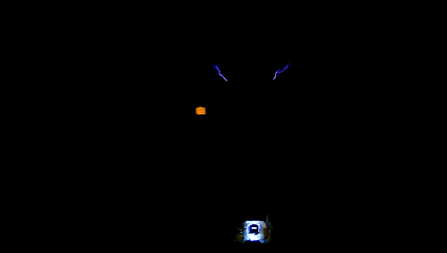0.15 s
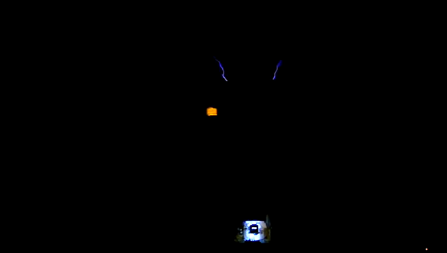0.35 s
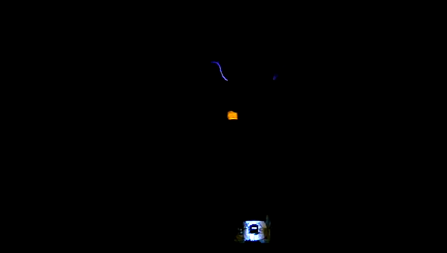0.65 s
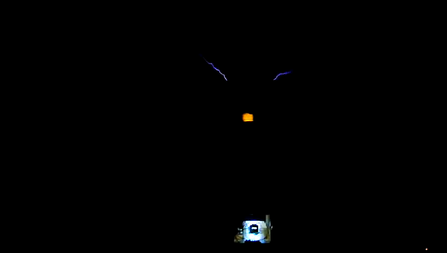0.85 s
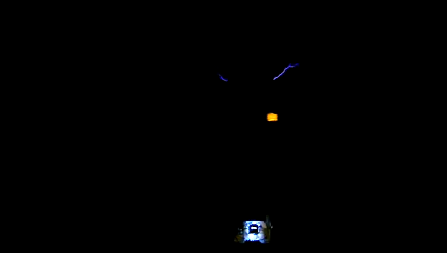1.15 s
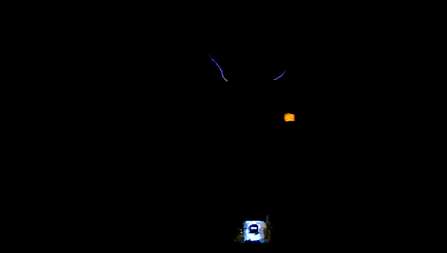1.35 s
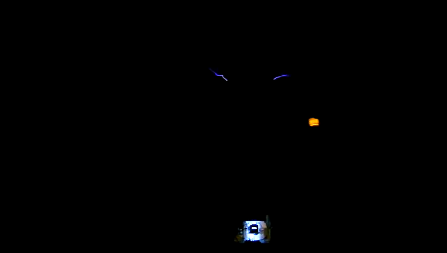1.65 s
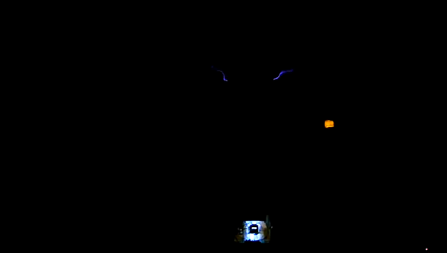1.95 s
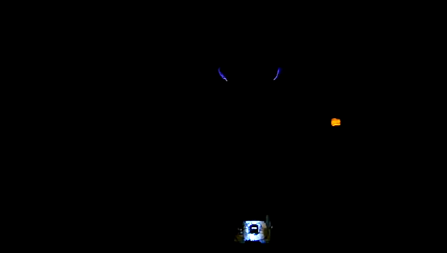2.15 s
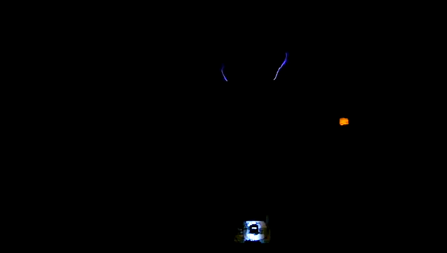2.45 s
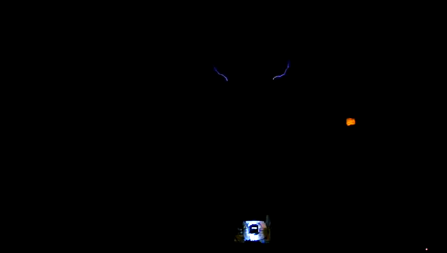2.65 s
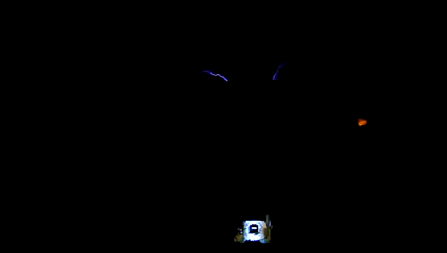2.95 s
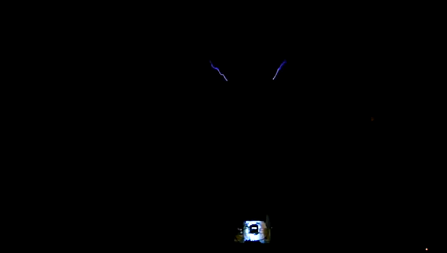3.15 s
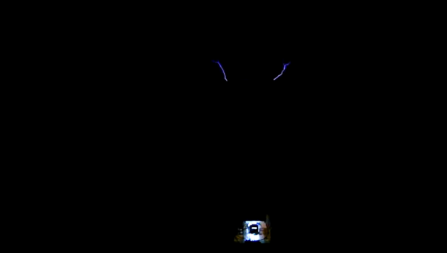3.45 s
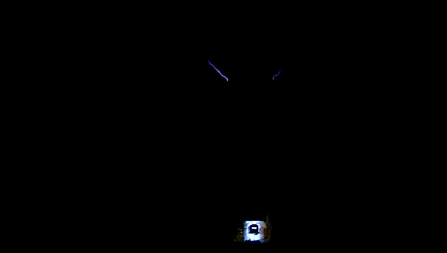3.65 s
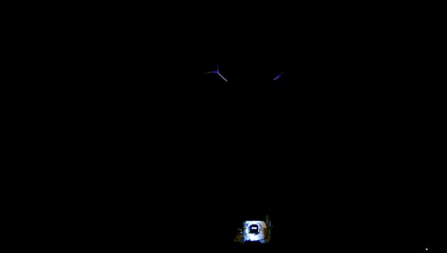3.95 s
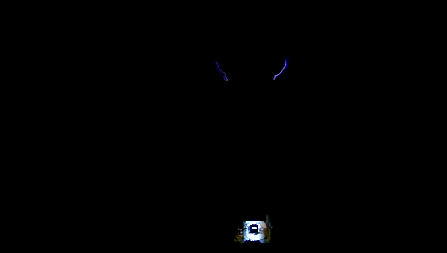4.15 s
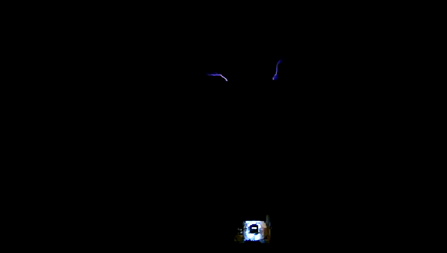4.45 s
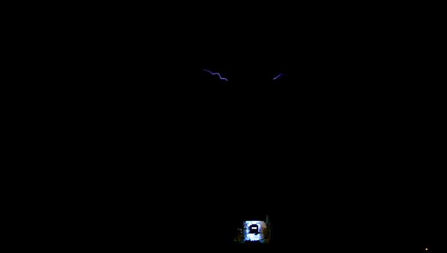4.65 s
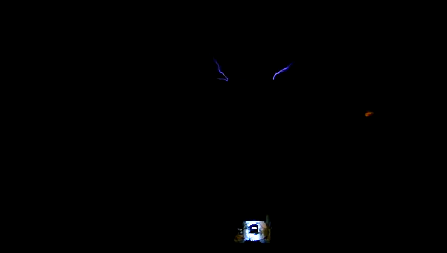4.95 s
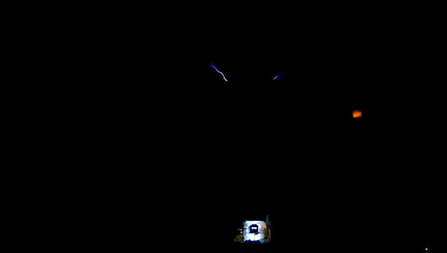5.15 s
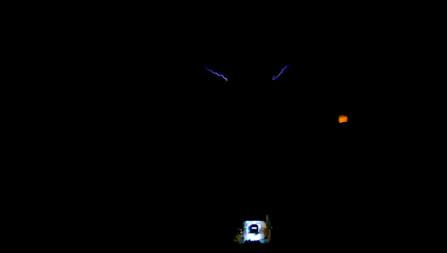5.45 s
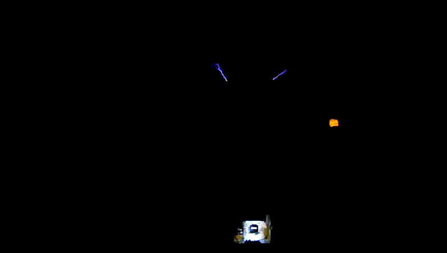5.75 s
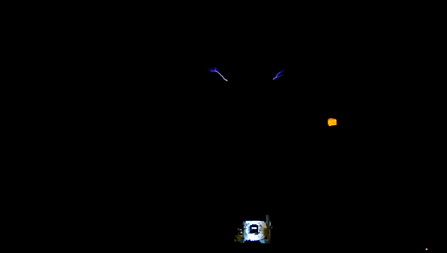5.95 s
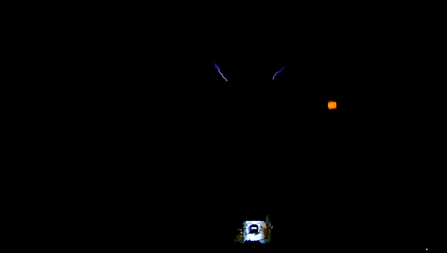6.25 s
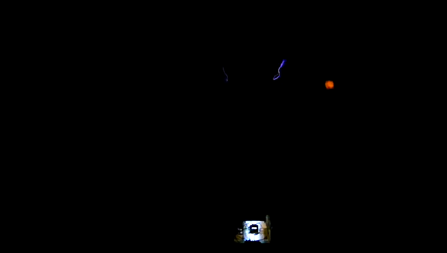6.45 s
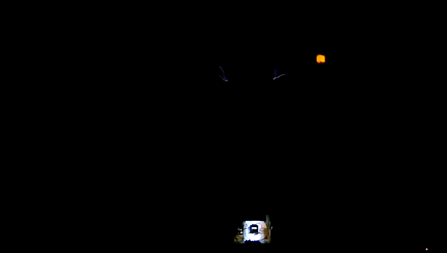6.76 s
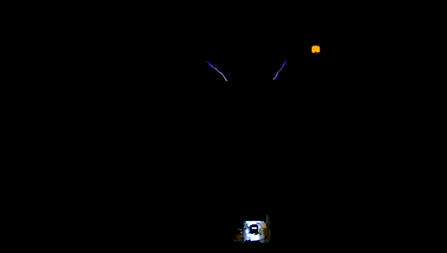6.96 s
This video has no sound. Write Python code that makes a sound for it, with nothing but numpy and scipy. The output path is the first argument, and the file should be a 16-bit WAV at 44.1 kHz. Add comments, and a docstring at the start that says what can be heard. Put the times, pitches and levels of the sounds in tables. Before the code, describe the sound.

Steady, loud electrical discharge from a spark-gap coil, a gritty mains-rate buzz full of crackling streamers and sharp snaps, ringing in a hard-walled garage.

```python
"""Spark-gap coil in a bare garage

A high-voltage coil runs steadily a few metres from a mono microphone: a harsh, buzzing sizzle.
Its gap fires four times per mains half cycle; each firing is a filtered click in the gap and in two streamers.
The streamers crack unevenly and now and then snap hard. Floor, walls and a noise tail smear the clicks.
Resonances of the garage ring along; a wavering hum and filtered-noise rumble lie beneath.
"""
import sys
import numpy as np
from scipy import signal
from scipy.fft import rfft, irfft
from scipy.io import wavfile
from scipy.ndimage import uniform_filter1d

SR = 44100
rng = np.random.default_rng(int(sys.argv[2]) if len(sys.argv) > 2 else 0)


def transcribe(u):
    """Save the signal u as a 16-bit wav file named by the first command-line argument.

    u: samples, shape (n,) or (channels, n), limited to [-1, 1]; the rate is SR.
    q: integer samples, one column per channel.
    """
    v = np.clip(np.atleast_2d(u).T, -1, 1)
    q = np.round(v * 32767).astype(np.int16)
    wavfile.write(sys.argv[1], SR, q)


N = 312669
TIME_S = np.arange(N) / SR

# low background rumble, relative spectrum: f/Hz, level/dB
RUMBLE_SPECTRUM = [(20, -1.5), (45, -8), (75, 1), (115, -1), (160, -3), (300, 7), (1000, -16), (4000, -46)]
# hum coming and going: t/s, rms level/dB
HUM_LEVEL = [(0, -65), (.5, -67), (1.2, -60), (1.45, -75), (2.5, -65), (3.4, -65), (3.8, -73), (4.3, -64),
             (5.8, -63), (6.15, -71), (6.5, -63)]
# first reflections from ceiling and walls: delay/s, level/dB
ECHOES = [(.0036, -6), (.0093, -4.5), (0.01, -3), (0.0122, -4), (0.0151, -22), (0.017, -16.5)]
# resonances of the garage and the things in it: f/Hz, width/Hz, lift/dB
RINGS = [(184.4, 1.5, 15), (239.6, 2, 9), (290, 16, 5.5), (327, 4, 9), (344.5, 4, 8.5), (411.8, 2.5, 11),
         (502, 3, 7), (566, 10, 5.5), (670.2, 4, 7), (706.6, 3, 6), (756.4, 3, 6), (816.9, 4, 5),
         (962.3, 4, 4), (1227.4, 6, 5), (1434.6, 5, 4), (1512.7, 7, 4.5), (2252, 20, 3.5), (2897, 25, 4),
         (3031, 19, 5), (3196, 22, 4), (3488, 18, 3), (3731, 25, 4), (3853, 14, 3), (3937, 20, 2.5),
         (4157, 16, 4), (4861, 25, 3.5), (4933, 14, 3.5), (5130, 120, 1), (5469, 20, 4), (6105, 12, 5.5),
         (6177, 40, 5.5)]
# bands that cancel at the microphone position: f/Hz, width/Hz, level/dB
HOLLOWS = [(260, 10, -4), (385, 35, -5), (440, 12, -4), (520, 24, -5), (585, 8, -6), (735, 25, -3),
           (1306, 75, -5.5)]
# firings in a mains half cycle, before scatter: place/(0-1 of half cycle), level/dB
FIRINGS = [(.08, -1), (.3, -1), (.58, -4.8), (.87, -1.5)]
# slow swell of the discharge, before flutter and lurches: t/s, level/dB
SLOW_SWELL = [(0.0, -25.6), (0.35, -25.15), (0.68, -25.1), (0.85, -25.7), (1.05, -25.3), (1.2, -25.8),
              (1.4, -25.2), (1.8, -25.3), (2.2, -25.15), (2.35, -25.3), (2.55, -24.7), (2.85, -25.8),
              (3.3, -25.8), (3.6, -25.35), (4.1, -25.8), (4.35, -25.0), (4.75, -25.5), (5.0, -24.7),
              (5.15, -25.7), (5.35, -25.1), (5.7, -25.1), (6.05, -25.8), (6.25, -25.3), (6.4, -25.6),
              (6.75, -24.8), (7.0, -25.7)]
# brief surges and falters: t/s, Gaussian sigma/s, streamer level/dB, gap level/dB
LURCHES = [(.07, .03, -.3, 1.5), (.39, .04, .3, 2), (.55, .025, -.8, -.3), (.74, .02, .6, 1.3),
           (.98, .018, -1.3, -1.6), (1.05, .02, .3, 1.5), (1.22, .03, .3, -1), (1.6, .06, .8, -1.2),
           (1.87, .018, -1.4, -1.4), (2.17, .05, 0, .7), (2.42, .02, -.8, -1.2), (2.61, .02, 1, 1.2),
           (2.88, .03, -1.1, -1.8), (3.01, .04, 0, 1.6), (3.47, .022, -1.8, -3), (3.59, .02, 1, .5),
           (3.87, .028, -.6, -4.2), (4.01, .015, -1.2, -.6), (4.17, .05, .4, -1.5), (4.33, .018, .3, 1.1),
           (4.41, .018, -.5, -1.5), (4.7, .05, 1, -1.2), (4.85, .018, -1.2, -.6), (5.13, .02, .6, 1.8),
           (5.2, .018, -1.6, -.4), (5.6, .04, 0, .8), (5.8, .025, -1.5, -.3), (5.97, .022, -1.4, -2.6),
           (6.2, .03, .2, .9), (6.31, .025, 0, -1.3), (6.48, .02, -.8, -.8), (6.99, .03, 0, 1)]
# relative spectrum of a bang in the gap: f/Hz, level/dB
GAP_SPECTRUM = [(100, -65), (170, -34), (280, -17.5), (650, -17.5), (820, -13), (1000, -10), (2000, -8),
                (3100, -3.5), (4000, 0.5), (5100, -3.5), (5700, -5), (6400, -5), (7300, -17), (8600, -16.5),
                (10600, -10.5), (12500, -26), (15000, -43)]
# relative spectrum of a streamer's crack, duller from its long channel: f/Hz, level/dB
STREAMER_SPECTRUM = [(100, -71.5), (175, -30.5), (290, -22.5), (600, -14.5), (950, -14), (2000, -6),
                     (2500, -2.5), (2750, -2.5), (2950, -0.5), (3900, 0.75), (5050, -1.1), (5500, -5.5),
                     (6500, -8), (8500, -22.5), (10400, -18), (12500, -32), (15000, -46.5)]
# hardest streamer snaps, before floor and garage: t/s, peak level/dB
SNAPS = [(0.098, -13), (0.206, -12.2), (0.7915, -11.6), (0.8402, -11.1), (0.8737, -12.1), (0.9417, -9.4),
         (0.9568, -13.2), (1.1687, -13.1), (1.2068, -12.3), (1.7236, -8.4), (1.831, -13.4), (1.8491, -12.7),
         (1.8731, -12.5), (1.9507, -13.5), (1.9641, -12.2), (2.0416, -12.8), (2.8645, -11.3),
         (2.881, -13.8), (2.9566, -13), (3.1007, -13.2), (3.1749, -13.1), (3.2023, -13.3), (3.4495, -13.2),
         (3.4832, -12.9), (3.6316, -12.8), (3.6766, -12.8), (3.8328, -13.2), (3.8728, -12), (4.0067, -12.5),
         (4.031, -13.4), (4.0483, -12.4), (4.1075, -13.4), (4.1477, -12.8), (4.5511, -12.1),
         (4.7621, -12.3), (5.1338, -12.5), (5.3814, -13), (5.9317, -13.2), (5.9553, -13.2), (6.09, -12.1),
         (6.1144, -11.5), (6.1656, -12.3), (6.197, -12), (6.4742, -11.6), (6.8012, -13.4), (6.9917, -11.7),
         (7.0069, -11.9)]
# dead bands of the microphone's sound: f/Hz, width/Hz
NOTCHES = [(7860, 556), (11830, 580)]

HUM_HZ, HUM_WAVER_HZ = 411, 1.8
FLOOR_DELAY_S, FLOOR_DB = .00192, -8.5
HALF_CYCLE_RATE_HZ = 120.035
# capacitor charge swings between firings, so strong and weak bangs take turns
SWING_HZ, SWING_WIDTH_HZ, SWING_RMS_DB = 74, 22, 1.8
FLUTTER_DB, FLUTTER_PER_S = 0.18, 30
# strong discharge rasps evenly, weak one crackles: level, and power share of bare cracks
SMOOTH_ABOVE_DB, RAGGED_BELOW_DB = -25.25, -26.0
SMOOTH_SHARE, RAGGED_SHARE = .10, .39
TOP_HZ = 14950


def undb(db):
    """Decibels to amplitude gain."""
    return 10 ** (np.asarray(db) / 20)


def level(x, rms_db):
    """Scale to an rms level."""
    return x * undb(rms_db) / np.sqrt(np.mean(x ** 2))


def through(x, response):
    """Convolve with an impulse response, keeping the length."""
    return signal.fftconvolve(x, response)[:len(x)]


def click(spectrum, size=4096):
    """Minimum-phase pulse with a given spectrum, peak 1, by folding the cepstrum."""
    hz, db = np.transpose(spectrum)
    bins_hz = np.maximum(np.fft.rfftfreq(size, 1 / SR), 1)
    bins_db = np.interp(np.log(bins_hz), np.log(hz), db)
    cepstrum = irfft(np.log(undb(bins_db)))
    cepstrum[1:size // 2] *= 2
    cepstrum[size // 2 + 1:] = 0
    pulse = irfft(np.exp(rfft(cepstrum)))
    return pulse / pulse[np.argmax(np.abs(pulse))]


def resonance(x, hz, width_hz):
    """Two-pole band-pass, gain 1 at the centre."""
    return signal.lfilter(*signal.iirpeak(hz, hz / width_hz, fs=SR), x)


def impulses(times_s, sizes):
    """One impulse at each time."""
    inside = (times_s >= 0) & (times_s < N / SR)
    return np.bincount((times_s[inside] * SR).astype(int), sizes[inside], N)


def wander(per_s):
    """Straight lines between normal random values drawn at a given rate."""
    beats_s = np.arange(0, N / SR + 1, 1 / per_s)
    return np.interp(TIME_S, beats_s, rng.standard_normal(len(beats_s)))


def rumble():
    """Low background: noise shaped by the rumble spectrum."""
    return level(through(rng.standard_normal(N), click(RUMBLE_SPECTRUM)), -61.5)


def hum():
    """Thin sine under the sizzle, wavering in pitch and level."""
    pitch_hz = HUM_HZ + HUM_WAVER_HZ * wander(6)
    phase = 2 * np.pi * np.cumsum(pitch_hz) / SR
    rms_db = np.interp(TIME_S, *np.transpose(HUM_LEVEL))
    return np.sqrt(2) * np.sin(phase) * undb(rms_db)


def garage_tail(x, t60_s=0.42, treble_t60_s=0.31, split_hz=5000, build_s=0.0056):
    """Dense reverberation as decaying noise; the treble dies sooner."""
    t = TIME_S[:SR]
    noise = rng.standard_normal(SR)
    low = signal.sosfilt(signal.butter(1, split_hz, fs=SR, output="sos"), noise)
    treble = noise - low
    tail = low * np.exp(-np.log(1000) * t / t60_s) + treble * np.exp(-np.log(1000) * t / treble_t60_s)
    tail *= 1 - np.exp(-t / build_s)
    # lead in with the last second, so the room already rings at t = 0
    primed = np.concatenate([x[-SR:], x])
    return through(primed, tail / np.linalg.norm(tail))[SR:]


def echoes(x, sway_s=.00012, moves_per_s=8):
    """Direct sound and first reflections, whose paths change a little as the sparks move."""
    out = x
    for delay_s, db in ECHOES:
        lag_s = delay_s + sway_s * wander(moves_per_s)
        source = np.arange(N) - (lag_s * SR).astype(int)
        out = out + undb(db) * x[np.clip(source, 0, N - 1)]
    return out


def floor_bounce(x):
    """Direct sound and its mirror image in the floor."""
    return x + undb(FLOOR_DB) * np.interp(TIME_S - FLOOR_DELAY_S, TIME_S, x, left=0)


def garage_resonances(sound):
    """Narrow modes ring in parallel, then cancelling bands are cut in series."""
    sound = sound + sum((undb(db) - 1) * resonance(sound, hz, width_hz) for hz, width_hz, db in RINGS)
    for hz, width_hz, db in HOLLOWS:
        sound = sound + (undb(db) - 1) * resonance(sound, hz, width_hz)
    return sound


def firings(jitter_s, scatter_db):
    """Breakdowns near fixed places of each half cycle, as hard as the capacitor's charge allows."""
    place, db = np.transpose(FIRINGS)
    cycles = np.arange(-1, int(N / SR * HALF_CYCLE_RATE_HZ) + 1)[:, None]
    shift, strength = rng.standard_normal((2, len(cycles), len(place)))
    times_s = (cycles + place) / HALF_CYCLE_RATE_HZ + jitter_s * shift
    swing = level(resonance(rng.standard_normal(N), SWING_HZ, SWING_WIDTH_HZ), 0)
    swing_db = SWING_RMS_DB * np.interp(times_s, TIME_S, swing)
    sizes = undb(db + scatter_db * strength + swing_db)
    return times_s.ravel(), sizes.ravel()


def discharge_db():
    """Streamer and gap levels: shared slow swell and quick flutter, then brief surges and falters."""
    shared_db = np.interp(TIME_S, *np.transpose(SLOW_SWELL)) + FLUTTER_DB * wander(FLUTTER_PER_S)
    lurches_db = sum(np.outer(dbs, np.exp(-.5 * ((TIME_S - s) / sigma_s) ** 2))
                     for s, sigma_s, *dbs in LURCHES)
    return shared_db + lurches_db


def sparks(times_s, sizes, wander_s, scatter_db, steady_s=0.038):
    """Impulse per firing, scattered as the channel moves; the supply holds mean power at 1."""
    path, strength = rng.standard_normal((2, len(times_s)))
    scattered = sizes * undb(scatter_db * np.minimum(strength, 1.6))
    train = impulses(times_s + wander_s * path, scattered)
    power = uniform_filter1d(train ** 2, int(steady_s * SR))
    return train / np.sqrt(power + 1e-12)


def gap(times_s, sizes):
    """Even bangs low in the coil, heard mostly by way of the walls."""
    bangs = sparks(times_s, sizes, wander_s=.00005, scatter_db=1.0)
    in_room = echoes(floor_bounce(bangs)) + undb(9) * garage_tail(bangs)
    return through(in_room, click(GAP_SPECTRUM))


def streamers(times_s, sizes, power_db):
    """Two crooked channels beam cracks their own way; bare ones stand out when the discharge is weak."""
    bare = sum(sparks(times_s, sizes, wander_s=.0004, scatter_db=6) for _ in range(2))
    # channels change shape, so cracks reach the walls with scatter of their own
    spread = [sparks(times_s, sizes, wander_s=.0004, scatter_db=3.5) for _ in range(2)]
    walls = sum(echoes(cracks) + undb(2.0) * garage_tail(cracks) for cracks in spread)
    share = np.interp(power_db, [RAGGED_BELOW_DB, SMOOTH_ABOVE_DB], [RAGGED_SHARE, SMOOTH_SHARE])
    share = np.clip(share, 0, 1)
    bare_part = np.sqrt(share) * level(floor_bounce(bare), 0)
    walls_part = np.sqrt(1 - share) * level(walls, 0)
    return through(bare_part + walls_part, click(STREAMER_SPECTRUM))


def snaps():
    """Hard cracks beamed straight at the microphone: floor bounce but no walls."""
    times_s, peak_db = np.transpose(SNAPS)
    return through(floor_bounce(impulses(times_s, undb(peak_db))), click(STREAMER_SPECTRUM))


def coil():
    """Each firing sounds in the gap and in both streamers; snaps are added."""
    times_s, sizes = firings(jitter_s=.0008, scatter_db=2.2)
    streamer_db, gap_db = discharge_db()
    bangs = level(gap(times_s, sizes), -4.5) * undb(gap_db)
    cracks = level(streamers(times_s, sizes, streamer_db), -3.0) * undb(streamer_db)
    return bangs + cracks + snaps()


def scene():
    """Coil through the garage's resonances, over hum and rumble; two equal channels."""
    return np.tile(rumble() + hum() + garage_resonances(coil()), (2, 1))


def record(dry):
    """Microphone response: two deep treble notches and a steep top cut."""
    for hz, width_hz in NOTCHES:
        for _ in range(2):  # twice, for depth
            dry = dry - resonance(dry, hz, width_hz)
    return signal.sosfilt(signal.ellip(12, .2, 80, TOP_HZ, fs=SR, output="sos"), dry)


dry = scene()
out = record(dry)
transcribe(out)
```